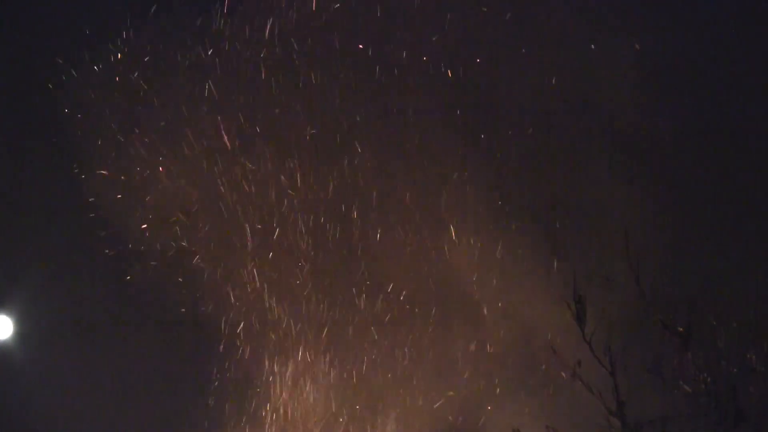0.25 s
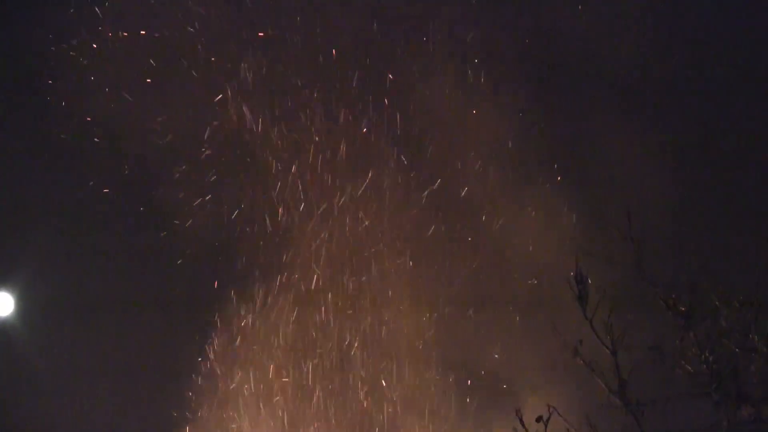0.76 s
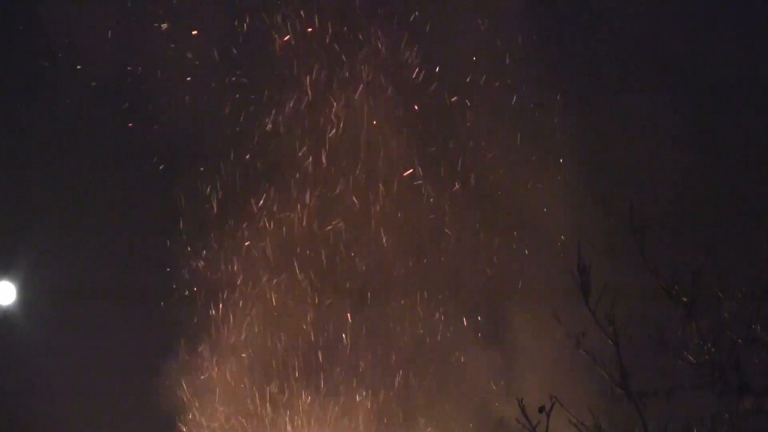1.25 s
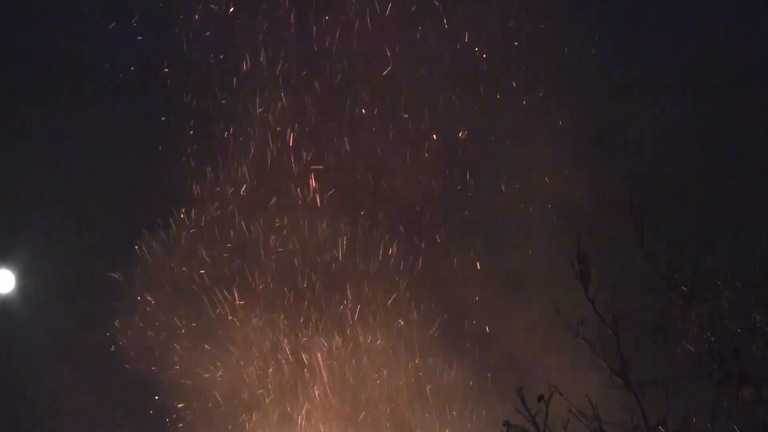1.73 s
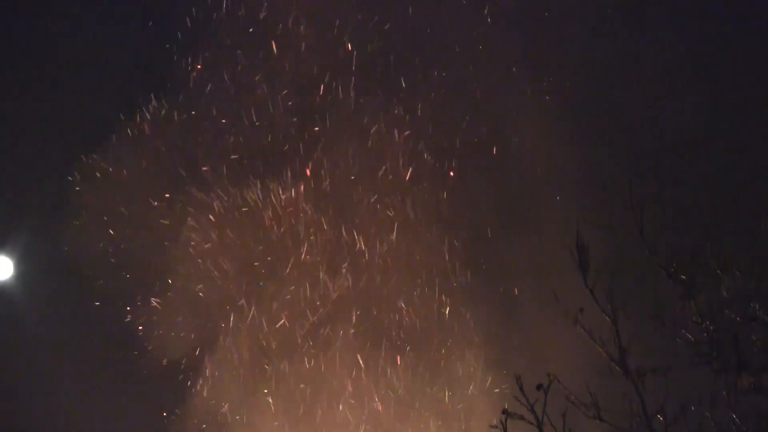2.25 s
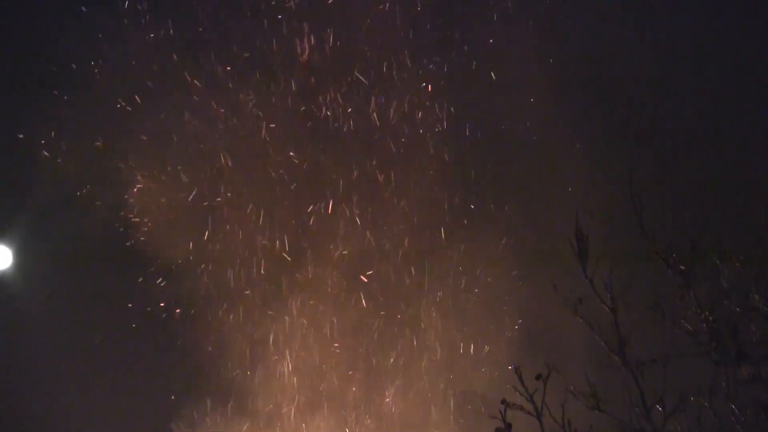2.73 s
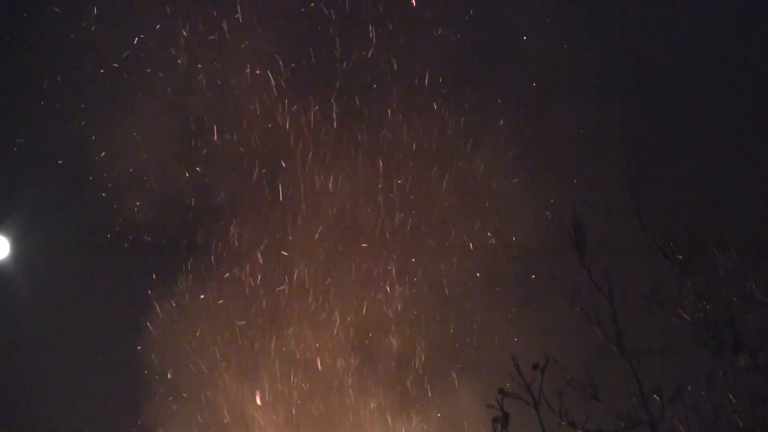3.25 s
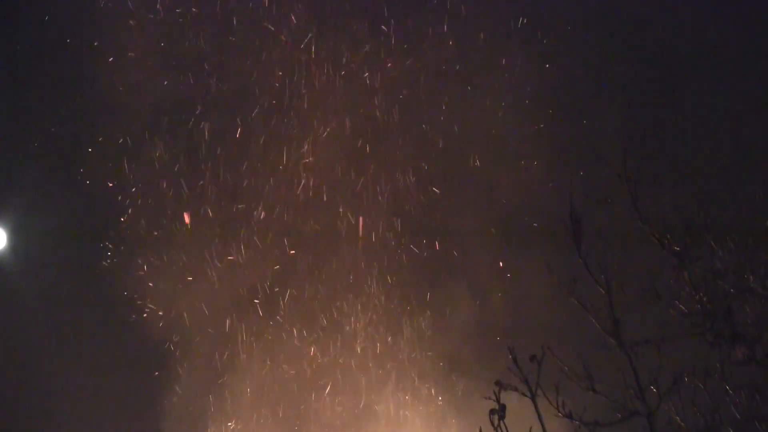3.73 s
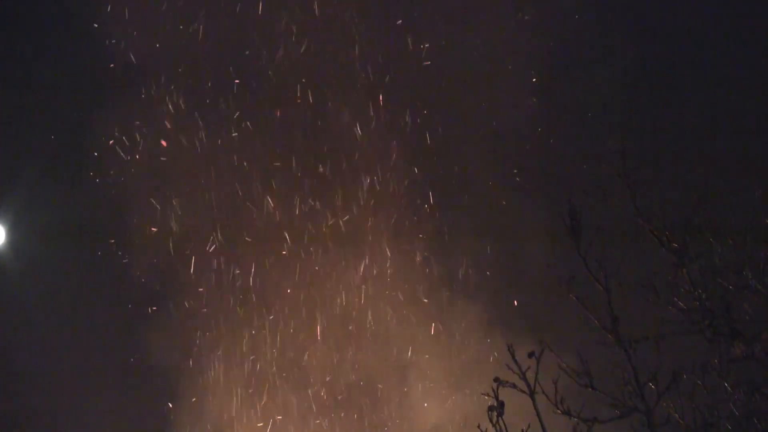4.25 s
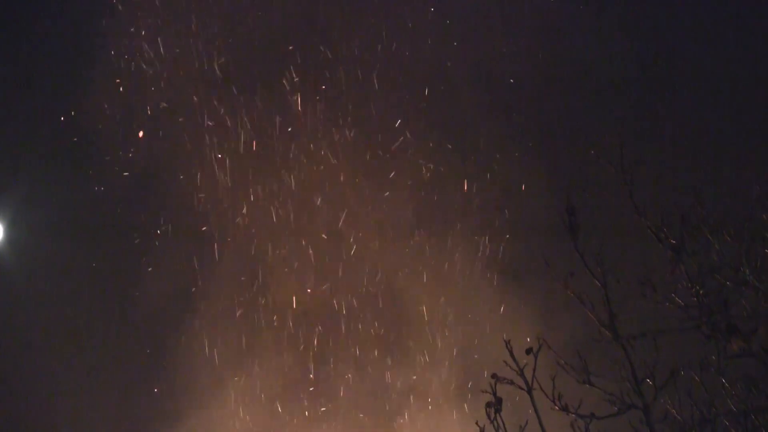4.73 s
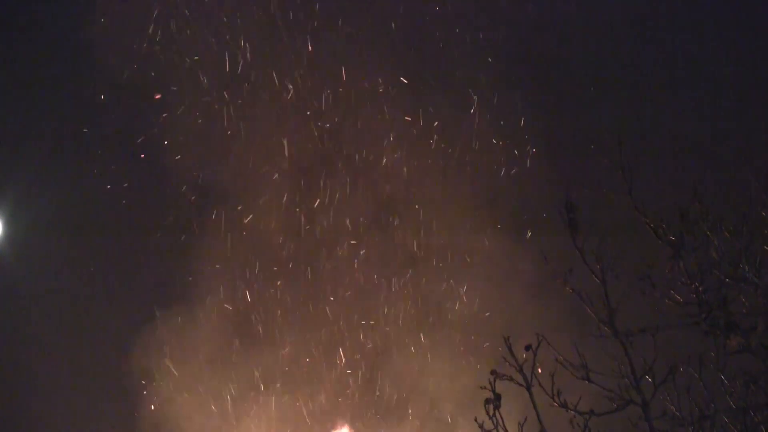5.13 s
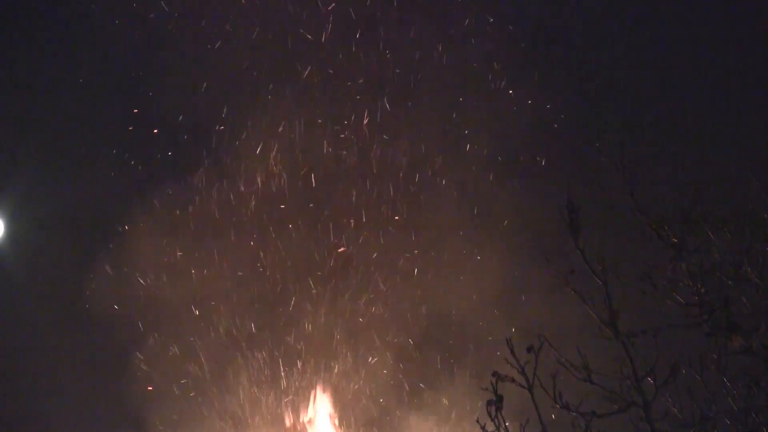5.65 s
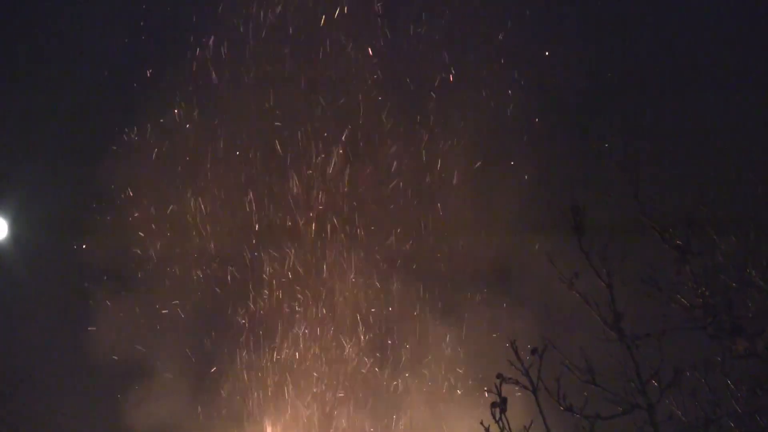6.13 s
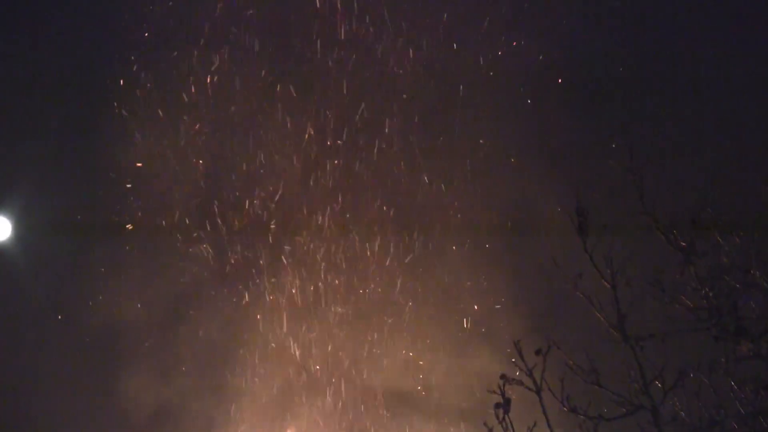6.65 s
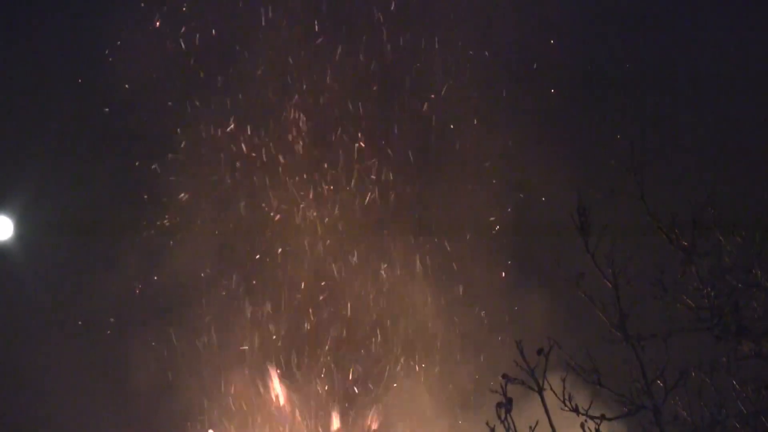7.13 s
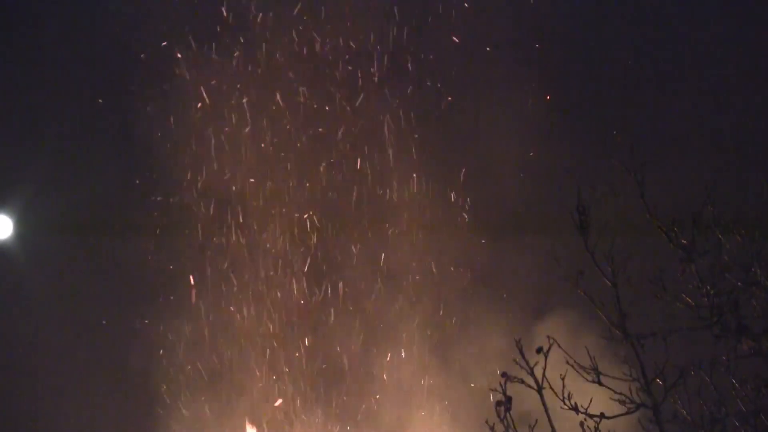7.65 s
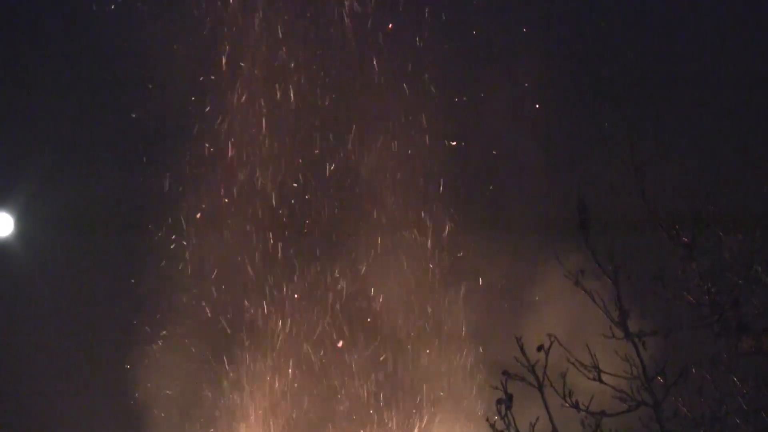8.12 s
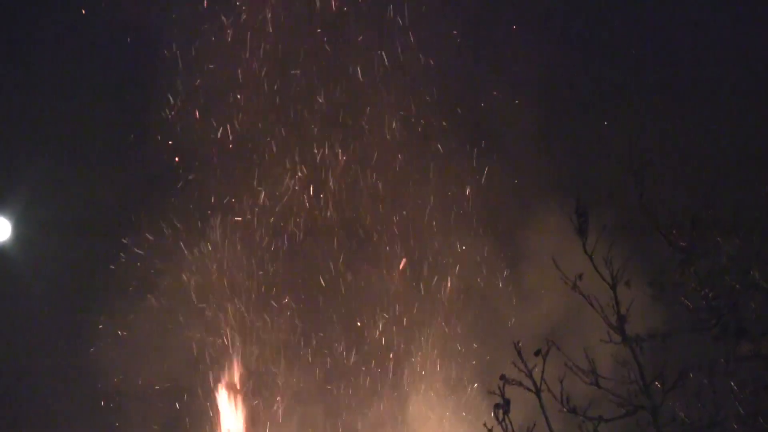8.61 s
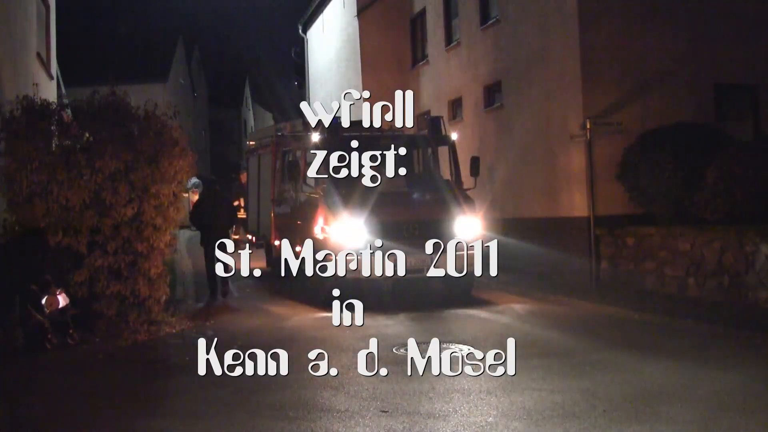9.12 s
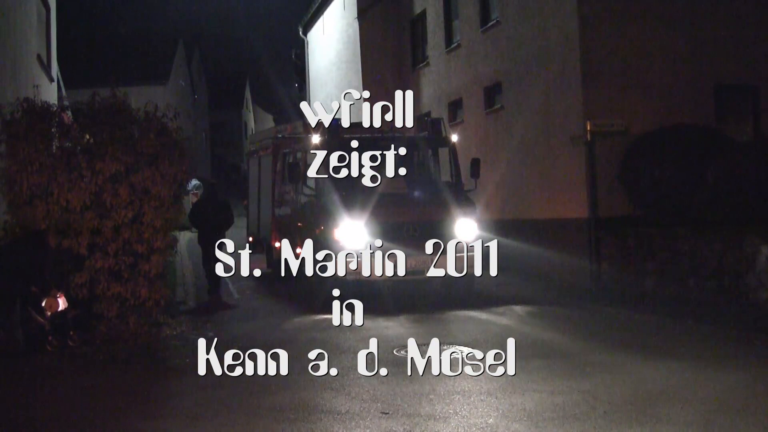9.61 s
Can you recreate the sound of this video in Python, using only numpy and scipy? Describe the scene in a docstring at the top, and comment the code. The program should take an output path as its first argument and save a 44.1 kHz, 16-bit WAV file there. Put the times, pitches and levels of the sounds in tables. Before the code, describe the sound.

A large wood bonfire burns outdoors for about ten seconds, heard in stereo from some metres away. A low, softly flickering rumble of flames runs throughout, with faint ember ticks. Over it, sharp, dry cracks and pops come irregularly, many each second, scattered slightly left and right, each with a short echo from trees and walls. A very loud crack with a brief high ring comes at 0.9 seconds, another at 1.2. Strong pops at about 2.2 and 3.2 seconds carry a low thump of air. The biggest cluster follows at 4.5 and 4.9 seconds, two ringing cracks, the first with a thump, as the rumble swells slightly. More strong snaps land near 5.5, 6.3 and 6.8 seconds, and between 7.3 and 8.3. The loudest peaks slightly overload the microphone. After that the crackling continues a little lighter over the same rumble.

```python
"""Bonfire at night

A large wood fire, some metres from a stereo camera microphone. Hot air roars low and small embers tick.
Sap pockets burst as short cracks, some with ringing splinters, the biggest with a thump of air.
Trees and walls return each crack as a swelling, fading echo; the loudest overload the input."""
import sys
import numpy as np
from scipy import signal
from scipy.fft import rfft, irfft, next_fast_len
from scipy.io import wavfile
from scipy.ndimage import uniform_filter1d

SR = 44100
rng = np.random.default_rng(int(sys.argv[2]) if len(sys.argv) > 2 else 0)


def unload_audio(sound):
    """Save the sound as a 16-bit wav file, at the path given as the first command line argument."""
    columns = np.transpose(np.atleast_2d(sound))
    # keep every value between -1 and 1, then stretch to whole-number steps
    steps = np.round(np.clip(columns, -1, 1) * 32767)
    wavfile.write(sys.argv[1], SR, steps.astype(np.int16))


N = 435266

# spectrum of the flames: f/Hz, relative density/dB
ROAR_SPECTRUM = [(15, -42), (25, -3), (105, -3.5), (185, -13.5), (545, -31), (863, -40.5), (1020, -42),
                 (6210, -49), (6740, -49), (7510, -55), (9570, -46.5), (16000, -55)]
# slow surges of the flames: t/s, level/dB
ROAR_SURGES = [(0.0, -36.5), (1.7, -34), (3.08, -36), (3.16, -31), (3.3, -36), (4.64, -32.5), (9.76, -36),
               (9.87, -36)]
# stereo image of the flames: f/Hz, left-right likeness (0-1)
ROAR_LIKENESS = [(30, .99), (100, .98), (180, .9), (350, .5), (800, .1)]
# air pushed by big bursts: t/s, level/dB
AIR_THUMPS = [(0.202, -17), (2.198, -10.5), (3.152, -5.5), (4.536, -7.5), (5.491, -17), (6.789, -23)]
# splinters that ring as they fly off: t/s, level/dB, f/Hz
SPLINTER_RINGS = [(0.199, -21, 5500), (0.8887, -5, 2600), (1.208, -15, 3850), (1.406, -25, 5160),
                  (2.1983, -13, 5560), (3.1518, -22, 2980), (3.487, -29, 4530), (4.5321, -9.5, 2650),
                  (4.9125, -7.5, 4250), (5.4865, -25, 6500), (5.7593, -19, 6200), (6.79, -14, 4370),
                  (7.2732, -17, 4800), (7.4075, -22, 5360), (8.0966, -23, 3300), (8.895, -24.5, 5000),
                  (9.564, -35, 3220)]
# bursting sap pockets: t/s, level/dB, body at 750 Hz/dB, snap at 11 kHz/dB, left minus right/dB
SAP_BURSTS = [(0.042, -31, -5, 3, 3), (0.058, -24, -7, -5, 1), (0.093, -15.5, -7, 2, -3),
              (0.199, -7, -5, -7.5, 1), (0.216, -13, -19, 4, 3), (0.379, -26, -6, 11, 5),
              (0.601, -21.5, -10.5, 4.5, 2), (0.669, -21, -13, 3, 1), (0.743, -22, -7, 2.5, 4),
              (0.815, -31, -4, 6, 1), (0.89, -2.5, -0.5, -10.5, 3), (0.927, -16, -7, -11, 2),
              (0.954, -9.5, -4, 1, 2), (1.042, -24, 1, 2, 2), (1.062, -16, -6.5, -5, 1),
              (1.159, -16.5, -1, 5, -1), (1.208, -5, -8.5, -7, 2), (1.342, -22.5, -16, -4, 1),
              (1.355, -18, -1, 1, 5), (1.383, -21, -2, 9, 4), (1.404, -11, -11, -7, 0),
              (1.446, -23.5, -27, 0, -7), (1.511, -20.5, -6, 1, 6), (1.529, -24, -10, -4, -5),
              (1.638, -10, -9, -5, 3.5), (1.698, -22, -8, 13, -5), (1.769, -14, 1, 9, -3),
              (1.774, -6.5, -5, 0, 3), (1.817, -14.5, -2, -4, 1), (2.077, -23.5, 3.5, 4, -2),
              (2.197, -8, -1, -6, 1), (2.21, -17, -3, 8, 7), (2.242, -12.5, -9, 1, -1),
              (2.516, -33, -14, 1, -1), (2.564, -27, -2, 8, -7), (2.607, -7.5, -2.5, 3.5, 1),
              (2.679, -13, -13, -2.5, 1.5), (2.817, -19, -10, 2.5, 7.5), (2.953, -15, -0.5, 5, -2),
              (2.988, -18.5, 0, 0, 0), (3.016, -6.5, -6, 2.5, 1), (3.15, -6.5, -2.5, -12, -1),
              (3.183, -20.5, -6, -3, -1), (3.199, -18.5, -17, -10, 4), (3.218, -23, -5, 1, 4),
              (3.277, -20, -11, -1, -1), (3.385, -23.5, -11, 3, 5), (3.394, -18, -10, 2.5, 2),
              (3.487, -12.5, -0.5, 7, 0), (3.536, -21, -6, -1, -1), (3.609, -26, -1.5, -1, 1),
              (3.731, -28, -15, -1, 0), (3.76, -14, -9, 5.5, 1), (3.877, -8, -5, 2, 1),
              (3.912, -19, -12, -3, -5), (3.925, -9, -8, 3, 0), (3.992, -22, -10, -1, -2),
              (3.999, -12, -4.5, -2, -1), (4.018, -25, -3, 7, -4), (4.054, -14, -4.5, 4.5, -2),
              (4.098, -25, -4, -7, -4), (4.162, -30, -3, 1, -2), (4.203, -27, -8, 1, -1),
              (4.247, -24, 2, -7.5, 1), (4.306, -18.5, -8.5, -3, -2), (4.411, -22, -20, 4, 5),
              (4.461, -22.5, -6, 2.5, 0), (4.53, -3.5, -4, -12, 0), (4.709, -30, -5, 0, -1),
              (4.79, -14.5, -13, -2, -2), (4.838, -22, -7, -5, -1), (4.877, -17.5, -10, -3.5, -3),
              (4.913, -4, -10.5, -18, 0), (4.949, -14.5, -14, -18, 0), (4.98, -21, -1, 1, 4),
              (4.998, -11.5, -6, -2.5, 0), (5.175, -21, -6, -1, -1), (5.204, -15, -6.5, 7.5, 0),
              (5.212, -17, -3, 4, 3), (5.346, -23, 2.5, -6.5, 0.5), (5.386, -19, 6, 0, 1),
              (5.478, -22, -7, 1, 3), (5.488, -7, -4, 0.5, 0), (5.54, -17, -13, -3, 0),
              (5.671, -21, -11, 8, -2), (5.69, -20, -10, -6.5, -2), (5.709, -24.5, -10, 4, -3),
              (5.758, -11.5, -4, -3.5, 1.5), (5.812, -8, -7, 2.5, 2), (5.95, -21, 4, 6.5, -4),
              (6.03, -18.5, -8, -1, 2), (6.049, -9, -3.5, -0.5, 0), (6.211, -20.5, 3, -12, -0.5),
              (6.289, -24, 0, -7, 5), (6.303, -21.5, -8, 6, -5), (6.335, -7, -4.5, -0.5, -2),
              (6.367, -14.5, -11, 4, 3), (6.484, -29, -6, -7, -1), (6.565, -17, -4, -1, -0.5),
              (6.755, -24, -8, -0.5, 1), (6.791, -5.5, -5, -4.5, -3), (6.84, -17.5, -10, -2, -2),
              (6.915, -23, -10, 3, -3), (6.969, -27.5, -7, 3, 0), (7.031, -21.5, -3, 4, -3.5),
              (7.055, -15, -9, 4, -1), (7.063, -12, 3.5, -2.5, 1), (7.193, -17, 0.5, -6, 2.5),
              (7.203, -22, -10, 7, -3), (7.272, -8.5, -3.5, 2, -2), (7.348, -23.5, -8, -3, -2),
              (7.409, -9, -6, -3, -2), (7.431, -20.5, -9, -3, 3), (7.477, -8, -3, 5.5, -2),
              (7.528, -19.5, -10, 2, -1), (7.58, -19.5, -12, 6, 4), (7.599, -10, -4.5, 2, -0.5),
              (7.637, -27, -16, 2, -1), (7.698, -20, -11, 2, 6), (7.704, -16, -6, 5, 2),
              (7.736, -17, -0.5, -1, 4), (7.93, -30.5, 9, 2, 3), (7.997, -17.5, -7.5, -1, -3),
              (8.099, -13, -1.5, -4.5, 0), (8.126, -15.5, -2.5, 2, 1), (8.204, -8.5, -3, 6, -1),
              (8.263, -20, -13, 0, 1), (8.327, -9.5, -4.5, 4, 0), (8.527, -32, -2, 1, 2),
              (8.671, -24.5, -9, -1, 1), (8.767, -13.5, -5.5, 1, 0), (8.891, -13.5, -5.5, -1, -1.5),
              (8.984, -27, 3, 4, -1), (9.126, -26.5, -8, -1, -2), (9.162, -23, 2, 7, -1),
              (9.183, -18, 2, 8, 6), (9.196, -15, -5.5, -2.5, -2), (9.33, -12.5, -10.5, -1.5, -6),
              (9.408, -27.5, -8, 2, 1), (9.446, -22.5, 0, -2.5, 0), (9.481, -16.5, -6, 3, -1),
              (9.498, -19.5, -4, 3, 2), (9.517, -16.5, -4, 4.5, -1), (9.563, -18.5, 0, -4.5, 0),
              (9.641, -22.5, -2.5, 3.5, 0), (9.777, -28, -14, 4, 1), (9.799, -25, 0, 6, 1),
              (9.847, -18.5, -11, 5, 6), (9.862, -23, 1, -3, -2)]
# corners of a crack's spectrum: f/Hz
CRACK_CORNERS = (250, 750, 1600, 4000, 11000, 16500)
# stereo image of a crack: f/Hz, left-right likeness (0-1)
CRACK_LIKENESS = [(300, 0.54), (700, 0.83), (1500, 0)]
# echo decay around the fire: f/Hz, t60/s
ECHO_DECAY = [(400, 0.27), (1000, 0.4), (2500, 0.39), (6000, 0.31), (13000, 0.27)]

OCTAVE_EDGES_HZ = 250 * 2. ** np.arange(6)  # lower edges of the echo's bands
OCTAVE_CENTRES_HZ = np.sqrt(2) * OCTAVE_EDGES_HZ
FLICKER_DB, FLICKER_HZ = 3.5, 8.2
EMBERS_PER_S, EMBER_FLOOR_DB, EMBER_SPREAD_DB = 16, -53.5, 5
THUMP_HZ, THUMP_T60_S = 90.5, 0.038
RING_WIDTH, RING_T60_S = 0.082, 0.045  # widths are shares of the pitch
TAIL_WIDTH, TAIL_T60_S, TAIL_DB = 0.35, 0.5, -15
NEAR_DB, FAR_DELAY_S, FAR_RISE_S = -4, 0.026, 0.013
ECHO_DB, ECHO_PER_DB, ECHO_SPREAD_DB = -8, 0.4, 1.5
CRACK_RISE_S, CRACK_T60_S, LONGER_PER_DB = 0.00078, 0.04, 0.0268  # t60 of a 0 dB burst
CRACK_SHAPE = 1.302  # above 1 the splintering holds a moment, then stops short
SPIKE_GAIN, SPIKE_S = 0.67, 0.002
CLIP_LEVEL, CLIP_HARDNESS, TOP_HZ = 0.46, 12, 15700


def undb(db):
    return 10 ** (np.asarray(db) / 20)


def on_log(hz, points, values):
    """Straight lines between points on a log-frequency axis."""
    return np.interp(np.log(np.maximum(hz, 1)), np.log(points), values)


def stereo_spectra(size, likeness):
    """Spectra of left and right white noise, correlated by 'likeness'."""
    mid, side = (rfft(rng.standard_normal(size)) for _ in range(2))
    mid, side = mid * np.sqrt((1 + likeness) / 2), side * np.sqrt((1 - likeness) / 2)
    return np.array([mid + side, mid - side])


def wander(rate_hz):
    """Random levels, each held for 1 / rate_hz seconds, smoothed twice."""
    hold = int(SR / rate_hz)
    steps = np.repeat(rng.standard_normal(N // hold + 1), hold)
    return 0.71 * uniform_filter1d(uniform_filter1d(steps, hold), hold)[:N]


def unit_rms(x):
    return x / np.sqrt(np.mean(x ** 2))


def add(track, start_s, sound):
    """Mixes a stereo sound into the track."""
    i = int(start_s * SR)
    track[:, i:i + sound.shape[1]] += sound[:, :max(N - i, 0)]


def flames():
    """Turbulent hot air: a low roar that surges and flickers, its bass alike in both channels."""
    size = next_fast_len(N)
    hz = np.arange(size // 2 + 1) * SR / size
    spectra = stereo_spectra(size, on_log(hz, *np.transpose(ROAR_LIKENESS)))
    spectra *= undb(on_log(hz, *np.transpose(ROAR_SPECTRUM)))
    roar = unit_rms(irfft(spectra, size)[:, :N])
    surge_db = np.interp(np.arange(N) / SR, *np.transpose(ROAR_SURGES))
    return roar * undb(surge_db + FLICKER_DB * wander(FLICKER_HZ))


def embers():
    """Embers tick at random moments: tiny cracks, many faint, few strong."""
    out, start_s = np.zeros((2, N)), 0
    while start_s < N / SR:
        start_s += rng.exponential() / EMBERS_PER_S
        db = EMBER_FLOOR_DB + min(EMBER_SPREAD_DB * rng.exponential(), 12.0)
        body, snap, pan = rng.standard_normal(3)
        add(out, start_s, crack(db, body_db=3.6 * body - 8.0, snap_db=6.9 * snap, pan_db=3.3 * pan))
    return out


def thumps():
    """A big burst pushes the air once: a low, damped swing, dead centre at the microphone."""
    out, t = np.zeros((2, N)), np.arange(8192) / SR
    swing = -np.sin(2 * np.pi * THUMP_HZ * t) * undb(-60 * t / THUMP_T60_S)
    for start_s, db in AIR_THUMPS:
        add(out, start_s, np.array([swing, swing]) * undb(db))
    return out


def splinters(size=16384):
    """Flying splinters ring roughly around one pitch, which lingers, blurred, in an echo tail."""
    out, t, hz = np.zeros((2, N)), np.arange(size) / SR, np.arange(size // 2 + 1) * SR / size
    rise = np.minimum(t / CRACK_RISE_S, 1)
    for start_s, db, pitch_hz in SPLINTER_RINGS:
        for width, t60, offset_db in ((RING_WIDTH, RING_T60_S, 0), (TAIL_WIDTH, TAIL_T60_S, TAIL_DB)):
            detuning = (hz - pitch_hz) / (width * pitch_hz)
            ring = unit_rms(irfft(stereo_spectra(size, likeness=0) / (1 + detuning ** 2)))
            add(out, start_s, ring * rise * undb(db + offset_db - 60 * t / t60))
    return out


def surroundings(size=24576):
    """Reflections and their fades by octave: ground and bushes answer at once, trees and walls later."""
    t = np.arange(size) / SR
    far_arrival = np.clip((t - FAR_DELAY_S) / FAR_RISE_S, 0, 1)
    swell = undb(NEAR_DB) + (1 - undb(NEAR_DB)) * far_arrival
    bands = [signal.butter(2, (hz, 2 * hz), "band", fs=SR, output="sos") for hz in OCTAVE_EDGES_HZ]
    reflections = np.array([signal.sosfilt(band, rng.standard_normal((2, N))) for band in bands])
    t60 = on_log(OCTAVE_CENTRES_HZ, *np.transpose(ECHO_DECAY))
    return reflections, swell * undb(-60 * t / t60[:, None])


def echo(reflections, fades, db, body_db, snap_db):
    """Each crack comes from another place in the pile, so it meets its own set of reflections."""
    size = fades.shape[1]
    i = rng.integers(N - size)
    gains = crack_colour(OCTAVE_CENTRES_HZ, body_db, snap_db)
    gains /= np.sqrt(np.average(gains ** 2, weights=OCTAVE_EDGES_HZ))  # weighted by bandwidth
    tail = np.einsum("b,bcn,bn->cn", gains, reflections[:, :, i:i + size], fades)  # sum of the bands
    carry_db = ECHO_DB + ECHO_PER_DB * db  # bigger bursts carry further
    return tail * undb(db + carry_db + ECHO_SPREAD_DB * rng.standard_normal())


def crack_colour(hz, body_db, snap_db):
    """Spectral gain of one burst: unity at 4 kHz, its own body below and snap above."""
    corner_db = (body_db - 1, body_db, 0.65 * body_db - 2, 0, snap_db, snap_db - 5)
    return undb(on_log(hz, CRACK_CORNERS, corner_db))


def crack(db, body_db, snap_db, pan_db, size=2048):
    """Splintering fibres: coloured noise that dies within hundredths of a second, later if louder."""
    t, hz = np.arange(size) / SR, np.arange(size // 2 + 1) * SR / size
    spectra = stereo_spectra(size, on_log(hz, *np.transpose(CRACK_LIKENESS)))
    noise = unit_rms(irfft(spectra * crack_colour(hz, body_db, snap_db)))
    t60 = CRACK_T60_S * np.exp(LONGER_PER_DB * db)
    splintering = undb(-60 * (t / t60) ** CRACK_SHAPE)
    first_break = SPIKE_GAIN * np.exp(-t / SPIKE_S)
    envelope = np.minimum(t / CRACK_RISE_S, 1) * (splintering + first_break)
    return noise * envelope * undb(db + np.array([[pan_db], [-pan_db]]) / 2)


def bursting_wood():
    """Sap pockets burst some metres away: the direct crack and its echo."""
    out, (reflections, fades) = np.zeros((2, N)), surroundings()
    for start_s, db, body_db, snap_db, pan_db in SAP_BURSTS:
        add(out, start_s, crack(db, body_db, snap_db, pan_db))
        add(out, start_s, echo(reflections, fades, db, body_db, snap_db))
    return out


def scene():
    """The fire as it reaches the microphone."""
    return bursting_wood() + splinters() + embers() + thumps() + flames()


def record(dry):
    """The camera's input flattens the loudest peaks, then the top treble is cut."""
    clipped = dry / (1 + np.abs(dry / CLIP_LEVEL) ** CLIP_HARDNESS) ** (1 / CLIP_HARDNESS)
    return signal.sosfilt(signal.ellip(8, .5, 70, TOP_HZ, fs=SR, output="sos"), clipped)


dry = scene()
out = record(dry)
unload_audio(out)
```